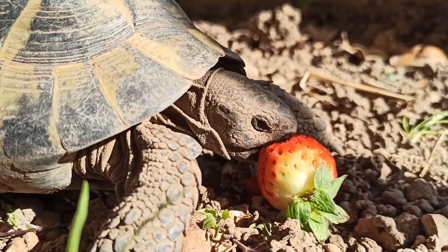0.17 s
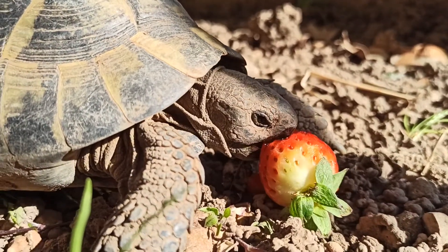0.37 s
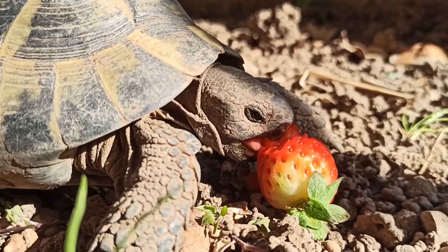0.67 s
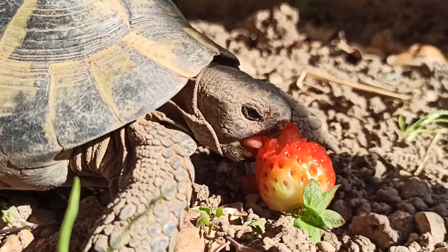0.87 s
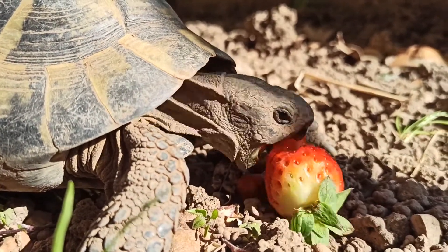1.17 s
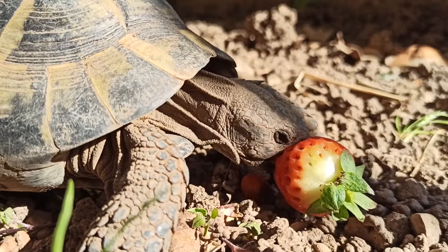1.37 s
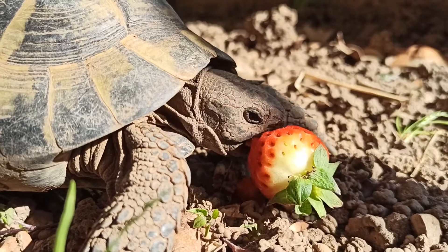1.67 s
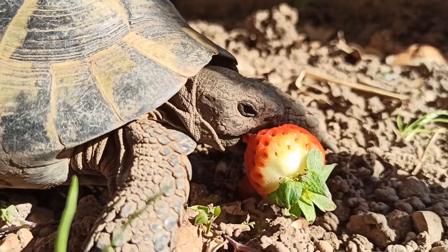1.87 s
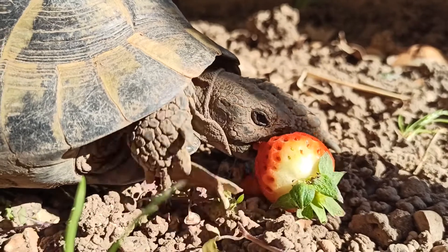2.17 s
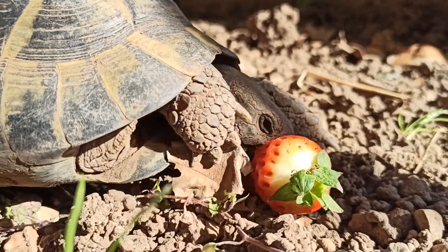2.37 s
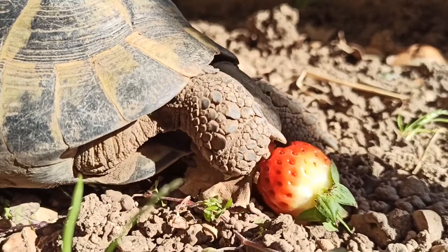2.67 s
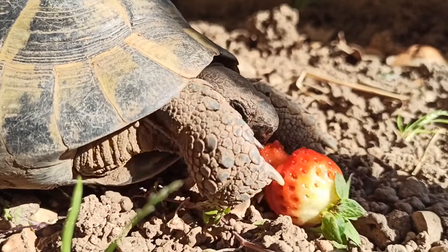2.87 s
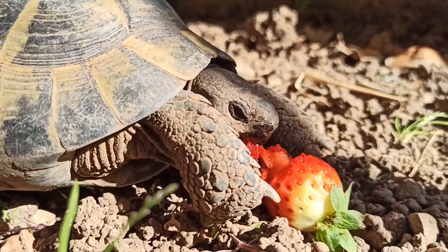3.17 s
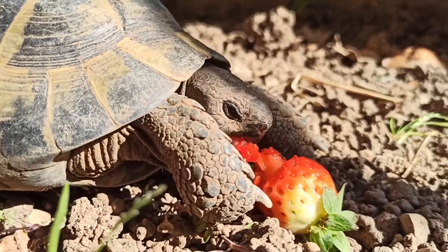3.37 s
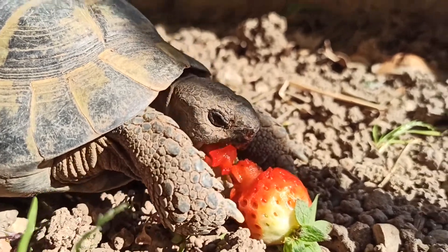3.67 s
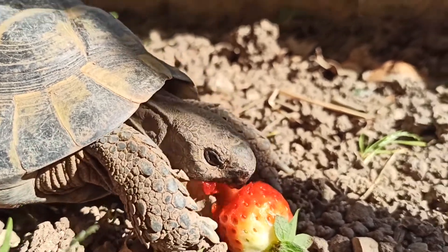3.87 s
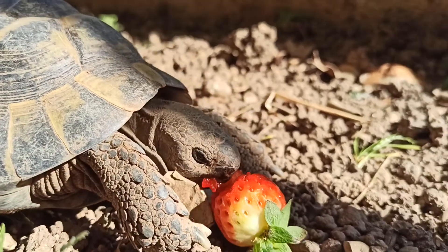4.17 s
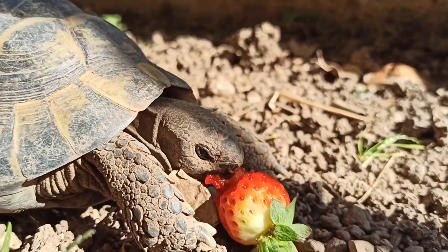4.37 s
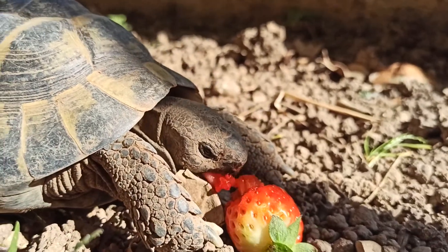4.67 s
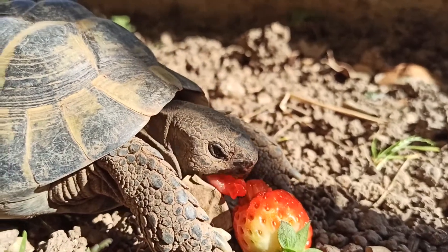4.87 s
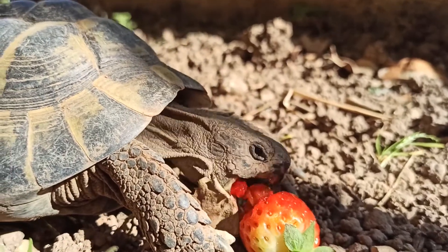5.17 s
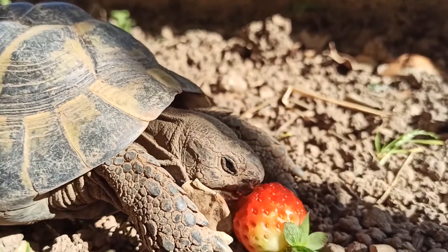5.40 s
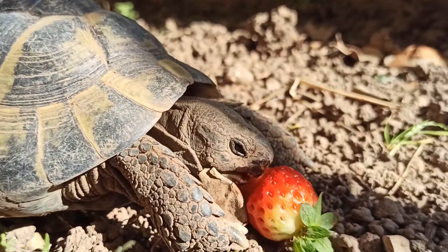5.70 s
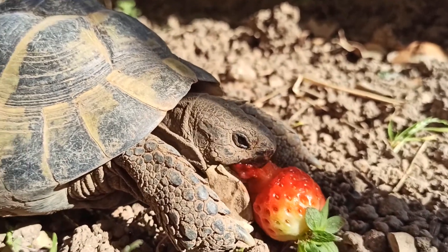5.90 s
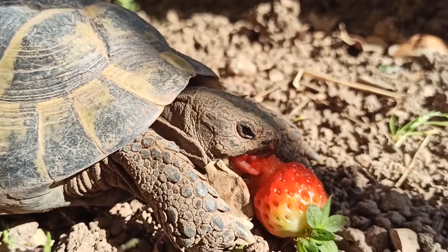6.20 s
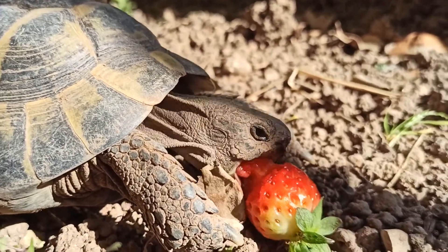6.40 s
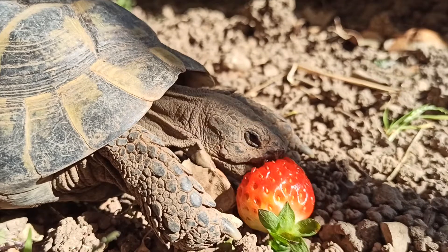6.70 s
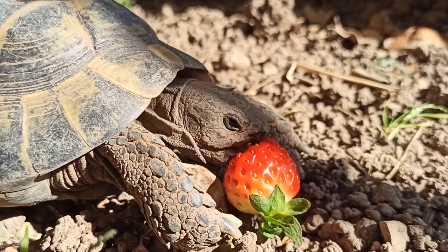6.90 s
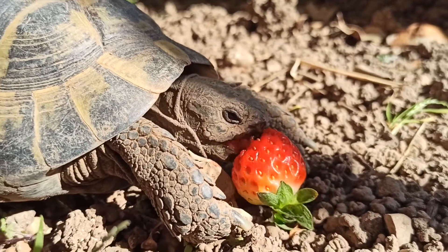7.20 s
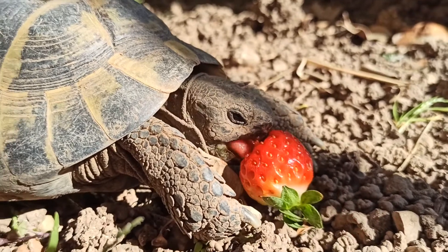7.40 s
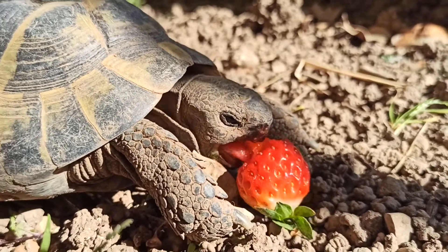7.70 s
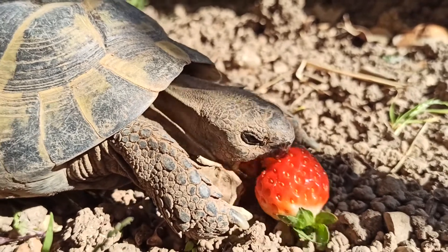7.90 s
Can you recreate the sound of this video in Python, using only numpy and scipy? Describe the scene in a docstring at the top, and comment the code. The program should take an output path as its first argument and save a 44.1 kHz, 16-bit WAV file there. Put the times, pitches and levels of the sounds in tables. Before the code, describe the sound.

A tortoise eats a strawberry on dry soil, heard very close outdoors with little bass and no echo. A soft low rumble and thin hiss run throughout; a faint wavering hum swells and fades within the first second. Tiny wet clicks come near 0.1 and 0.3 s, faint squishes at 0.6 and 1.2 to 1.5 s with a small pop. From 1.8 s the foreleg scrapes lightly, then crunches sharply around 2.2 to 2.9 s, with a brief dry rasp and snapping crumbs. Sparser scratches follow, with a strong crackling burst near 3.7 to 4.1 s. Soft low gulps start at 4.4 s. From about 5.1 to 5.9 s the shell slides with a coarse, gritty, ringing crunch. Moist pulp tears at 6.4 to 6.8 s, with another short scrape, then rapid sticky smacks and high juice pops at 7.0 to 7.6 s, and final soft squishes to 8 s.

```python
"""A tortoise eats a strawberry on dry, crumbly soil outdoors, close to a small microphone.
Filtered noise gives a steady rumble and hiss; a hum of two wavering sines swells in the first second.
Wet clicks (short noise breaks), squishes of pulp (dense grains) and single crumb cracks come next, then
popping juice (short sines) and scraping foreleg strokes (gated grit). Past 4.4 s soft gulps (falling
sines) join; near 5 to 6 s the shell slides over ringing clods; the last two seconds are mostly bites."""
import sys
import numpy as np
from scipy.fft import rfft, irfft, next_fast_len
from scipy.io import wavfile
from scipy.ndimage import map_coordinates

SR = 44100
rng = np.random.default_rng(int(sys.argv[2]) if len(sys.argv) > 2 else 0)


def int16_out(signal):
    """Quantize to a 16-bit WAV file."""
    q = np.round(np.clip(np.atleast_2d(signal).T, -1, 1) * 32767)
    wavfile.write(sys.argv[1], SR, q.astype(np.int16))


N = 355005

# Levels are those at the source, ahead of the microphone's response.
# Outdoor rumble and faint hiss. Each row: time in seconds, level in dB.
RUMBLE_LEVEL_S_DB = [(0, -50.5), (1.25, -52), (1.6, -54), (2.5, -55.5), (4.7, -56.5), (5.6, -55.5),
                     (6.3, -57), (8.05, -56.5)]
HISS_LEVEL_S_DB = [(0, -61), (1.2, -64), (4.4, -65.5), (6.2, -63), (7.3, -66.5), (8.05, -59.5)]
# Far-off hum. Each row: time in seconds, level in dB.
HUM_LEVEL_S_DB = [(0, -67), (.3, -54), (.8, -55.5), (1.05, -73.5), (8.05, -80)]
# Wet clicks of jaw, tongue and pulp. Each row: time in seconds, level over 5 ms in dB before SMACK_GAIN_DB,
# decay by 60 dB in seconds, body against the snap in dB.
SMACKS = [(0.0694, -48, 0.005, -20), (0.0785, -46.5, 0.0025, -25), (0.3449, -58, 0.027, -13),
          (1.3866, -53.5, 0.0087, -17), (1.4512, -45.5, 0.0028, -20), (4.4447, -56.8, 0.018, -3.5),
          (6.6662, -53, .007, -25), (6.9302, -51.5, .0033, -11), (7.0032, -49.5, 0.013, -16),
          (7.0453, -53, .009, -3), (7.0572, -58, .007, 6), (7.0998, -51.5, 0.033, 5.5),
          (7.1667, -62, 0.039, 12), (7.2872, -56, .011, -2), (7.2997, -47, 0.019, 4),
          (7.3282, -53.5, .014, 2), (7.4265, -49, .02, 3.5), (7.5263, -47, 0.025, 0.5),
          (7.5564, -52.5, 0.0049, 0), (7.571, -51, 0.0049, 1), (7.5789, -49.5, .005, 3),
          (7.603, -48.5, 0.025, -0.5), (7.9676, -48.5, 0.0058, -14)]
# Beak squeezing and tearing pulp. Each row: start in seconds, length in seconds,
# pulp level in dB before PULP_GAIN_DB, fizzing juice level in dB.
BITES = [(0.601, 0.057, -68, -59), (1.19, .11, -70.5, -72), (1.303, 0.15, -65.5, -57.5),
         (6.407, 0.085, -62, -73), (6.524, 0.32, -61, -75), (7.01, 0.035, -57, -68),
         (7.773, 0.25, -62.5, -80), (8.006, 0.042, -58, -76)]
# Hollow of the open beak. Each row: resonance in Hz, width in Hz, level against the pulp in dB.
BEAK_MODES = [(2330, 310, -1)]
# Larger crumbs of soil cracking. Each row: time in seconds, level over 5 ms in dB before CRACK_GAIN_DB,
# decay by 60 dB in seconds, body against the crack in dB.
CRUMBS = [(0.9475, -53, .029, -20), (2.0087, -49.5, 0.028, -29), (2.1022, -44, 0.025, -13.5),
          (2.3809, -41, 0.034, -13), (2.4015, -35.5, 0.02, -14), (2.4246, -34.5, 0.021, -24),
          (2.4795, -30.5, .012, -13.5), (2.4894, -39, 0.014, -18), (2.5628, -38.5, 0.017, -11.5),
          (2.6795, -45.5, .005, -11), (2.7522, -43, .012, -24), (2.8327, -38, 0.0059, -17.5),
          (2.8619, -45, .025, -19), (2.9079, -43.5, 0.033, -14), (3.1522, -49.5, 0.018, -2),
          (3.1574, -44, 0.0011, -3), (3.3027, -49.5, 0.02, -13), (3.5673, -39.5, 0.014, -12),
          (3.7395, -47.5, 0.0035, -13), (3.771, -45.5, 0.016, 1), (3.8017, -37, 0.0069, -15),
          (3.8305, -45.5, 0.0022, -10), (3.9863, -29.5, 0.0063, -18.5), (4.0174, -28.5, 0.013, -10),
          (4.0291, -29.5, 0.012, -9), (4.1171, -52, 0.0089, 11), (4.5798, -50, 0.019, -12),
          (4.7356, -47, 0.032, -10), (4.8806, -46.5, 0.004, -4), (4.9026, -37, 0.01, -13.5),
          (4.953, -47, .011, -15), (5.1185, -44.5, 0.0074, -7), (5.2688, -32.5, 0.021, -6),
          (5.3398, -40, 0.018, -16), (5.3623, -36.5, 0.017, -22), (5.4112, -39.5, 0.019, -4),
          (5.5008, -36.5, 0.02, -16), (5.5317, -38, 0.037, -9), (5.5673, -38.5, 0.04, -4),
          (5.637, -37, 0.023, -26), (5.6888, -40, 0.028, -17), (5.7054, -31.5, 0.014, -12),
          (5.7374, -30, .024, -13.5), (5.8068, -29.5, 0.019, -10), (6.0424, -51, 0.011, -7),
          (6.116, -46, 0.02, -5), (6.5526, -34.5, .031, -9.5), (6.5578, -41, 0.018, 0),
          (6.7398, -41.5, 0.022, -8), (6.7741, -37.5, .003, -9), (6.7805, -37.5, 0.025, -3),
          (6.8434, -47, 0.0036, -5), (7.0281, -45.5, .016, -17), (7.7869, -40.5, 0.01, -25)]
# Popping juice films and air pockets. Each row: time in seconds, peak in dB, starting pitch in Hz,
# decay by 60 dB in seconds.
POPS = [(1.451, -36, 2230, 0.019), (6.5589, -33, 2150, 0.026), (6.666, -40, 2430, 0.02),
        (7.028, -35.5, 3300, 0.015), (7.046, -36, 3300, .012), (7.1008, -51, 1470, .025),
        (7.3, -34.5, 4080, 0.015), (7.328, -31, 3780, 0.013), (7.4274, -32, 4070, 0.013),
        (7.428, -47.5, 1560, 0.047)]
# Strokes of a foreleg or the rolling fruit over the soil. Each row: start in seconds, length in seconds,
# grit level in dB before CLAW_GAIN_DB, level in dB of clods ground under the weight.
DRAGS = [(1.825, .21, -62, -81.5), (2.09, .28, -57.5, -73), (2.372, .118, -42.5, -56.5),
         (2.541, .23, -49.5, -58), (2.809, .11, -50, -68), (2.971, .04, -54, -68), (3.19, .16, -62.5, -72),
         (3.368, .07, -54.5, -73), (3.698, .1, -54.5, -63.5), (3.817, .145, -51.5, -59),
         (3.96, .1, -46, -56), (4.085, .07, -50, -55), (4.834, .065, -55, -59.5), (6.02, .13, -63, -77),
         (6.736, .108, -49, -55.5), (7.137, .26, -66, -75)]
# Scaly foreleg rubbing past the shell as it lifts. Each row: start in seconds, length in seconds, level in dB.
RASPS = [(2.203, 0.052, -43.5)]
# Soft, low knocks of the chewing mouth. Each row: time in seconds, level in dB before GULP_GAIN_DB.
GULPS = [(4.447, -43.5), (4.480, -41.5), (4.652, -41), (4.870, -34), (4.938, -41.5), (4.974, -45),
         (5.178, -42.5), (5.189, -41), (6.955, -46.5), (7.1, -43), (7.302, -41), (7.316, -39.5),
         (7.43, -47.5), (7.968, -44)]
# Shell sliding forward over grit. Each row: time in seconds, level in dB before its layers are mixed.
SLIDE_LEVEL_S_DB = [(4.9, -70), (5.12, -51.5), (5.32, -49), (5.4, -40.5), (5.63, -43), (5.72, -40.5),
                    (5.85, -44.5), (5.92, -65.5), (5.98, -75)]
# Small stones and clods under the shell. Each row: resonance in Hz, width in Hz, relative level in dB.
CLOD_MODES = [(715, 81, 2), (1200, 110, -9), (1870, 84, -3), (2650, 150, -12), (3370, 110, -0.5),
              (3870, 98, 4.5), (4655, 66, 2), (5800, 120, -5), (6540, 98, -15), (6660, 180, 4),
              (7670, 130, -5), (8100, 120, -8)]

# Spectra. Each row: frequency in Hz, relative level in dB per Hz.
RUMBLE_HZ_DB = [(28, -45), (40, -32), (52, 2), (64, -3.5), (100, 2.5), (170, 3), (260, -3), (400, -6.5),
                (600, -9.5), (1000, -20), (2000, -28), (5000, -67)]
HISS_HZ_DB = [(200, -13), (900, 1), (2300, 4.5), (4000, 8), (6500, 2.5), (8200, -6), (12000, -4.5),
              (16000, -7.5)]
TICK_HZ_DB = [(1500, -14), (4000, -3), (7000, 0), (15000, -1)]
SNAP_HZ_DB = [(1200, -41), (2400, -6.5), (3300, 11.5), (4300, 10), (6500, 5.5), (8500, -13), (15000, -21)]
MOUTH_HZ_DB = [(200, -1.5), (800, -7.5), (1500, -2), (2300, -7.5), (3200, -7), (6000, -44)]
PULP_HZ_DB = [(500, -6.5), (1300, -7.5), (2200, -5.5), (3100, 0), (4200, 2), (6700, 0.5), (8500, -12),
              (12000, -17), (15500, -18.5)]
FIZZ_HZ_DB = [(3000, -25), (7000, -7), (13000, 0)]
CRACK_HZ_DB = [(1500, -20), (3000, -10.5), (4200, 6.5), (5500, 4.5), (6700, 7.5), (8200, -6), (12000, -18),
               (16000, -12.5)]
CRUMB_BODY_HZ_DB = [(100, -13), (350, -4.5), (750, -1.5), (1400, 0.5), (2300, 4), (3400, 5.5),
                    (6000, -24.5)]
SOIL_HZ_DB = [(60, -45.5), (200, 5), (700, -12), (1200, -12.5), (2800, -10), (3700, -1), (4500, 4.5),
              (5400, 4), (6600, 1), (7600, -6), (8600, -39), (12000, -20), (15500, -25.5)]
GROUND_HZ_DB = [(300, -19.5), (750, 4), (1300, -3), (2600, 2), (5000, -14.5)]
DUST_HZ_DB = [(3000, -25), (7000, 8), (13000, -1)]
RASP_HZ_DB = [(1800, -30), (3100, -1.5), (4400, 8), (8000, -14.5)]
SHELL_HZ_DB = [(60, -25), (200, -8.5), (700, -6.5), (1100, -12), (2800, -5), (3400, -4), (4600, 1),
               (5500, 0), (6500, 2), (7100, -10), (7550, -3.5), (8600, -9.5), (12000, -17), (15000, -18)]
# Microphone's bass cut and uneven treble. Each row: frequency in Hz, gain in dB.
MIC_HZ_DB = [(30, -17), (46, -4.5), (4650, -4.5), (4850, -12), (5850, -12), (6200, -6), (6700, -3),
             (7100, -3), (7550, 1.5), (7850, -3), (8400, -4.5), (8750, -18.5), (10300, -23.5),
             (11350, -24.5), (11650, -6.5), (15500, -2.5)]

MIC_TOP_HZ = 15950
SMACK_GAIN_DB, PULP_GAIN_DB, CRACK_GAIN_DB, CLAW_GAIN_DB, GULP_GAIN_DB = 5.5, 9.0, 3.5, 2.5, 4.0
BITE_ATTACK_S, BITE_RELEASE_S = 0.013, 0.017
DRAG_ATTACK_S, DRAG_RELEASE_S = 0.018, 0.015
RASP_ATTACK_S, RASP_RELEASE_S = 0.0056, 0.0086
# level against the scrape (before CRACK_GAIN_DB), its scatter, median decay, body against the crack
SMALL_CRUMB_DB, SMALL_SCATTER_DB, SMALL_T60_S, SMALL_BODY_DB = -0.5, 3.5, 0.025, -9.5
# level at a -50 dB stroke, dB gained per dB of stroke, settling time
DUST_DB, DUST_GROWTH_DB_PER_DB, DUST_SETTLE_S = -65.5, 0.22, 0.06


def amp(db):
    """Decibels to gain."""
    return 10 ** (np.asarray(db) / 20)


def unit(x):
    """Scale to rms 1."""
    return x / np.sqrt(np.mean(x ** 2) + 1e-20)


def along(points, hz):
    """Read (Hz, dB) points on a log frequency axis."""
    f, db = np.transpose(points)
    return np.interp(np.log(hz + 1), np.log(f + 1), db)


def level(rows, outside_db=None):
    """Gain per sample from (s, dB) rows; outside them the end values hold unless outside_db is given."""
    s, db = np.transpose(rows)
    return amp(np.interp(np.arange(N) / SR, s, db, left=outside_db, right=outside_db))


def wobble(knots_hz):
    """Smooth random curve through knots_hz normal draws a second."""
    knots = rng.standard_normal(int(N * knots_hz / SR) + 4)
    return map_coordinates(knots, [np.arange(N) * knots_hz / SR])


def strokes(rows, attack_s, release_s):
    """Gain per sample from (start, length, dB) rows: each stroke rises, holds and dies away."""
    t, gain = np.arange(N) / SR, np.zeros(N)
    for start_s, length_s, db in rows:
        rise = np.clip((t - start_s) / attack_s, 0, 1)
        fall = np.exp(-np.maximum(t - start_s - length_s, 0) / release_s)
        gain = np.maximum(gain, amp(db) * rise * fall)
    return gain


def coloured(x, points, ripple_db=0, order=70):
    """Causal minimum-phase filter with the given spectrum and, if wanted, chance resonances."""
    m = 2 * next_fast_len(len(x) // 2 + 1024)
    cepstrum = irfft(np.log(amp(along(points, np.fft.rfftfreq(m, 1 / SR)))), m)
    # fold to positive time: minimum phase
    cepstrum[1:m // 2] *= 2
    cepstrum[m // 2 + 1:] = 0
    ripple = np.log(amp(ripple_db)) * np.sqrt(2 / order)
    cepstrum[1:order + 1] += ripple * rng.standard_normal(order)
    return irfft(rfft(x, m) * np.exp(rfft(cepstrum)), m)[:len(x)]


def resonate(x, modes):
    """Pass x through a parallel bank of (Hz, width Hz, dB) resonances."""
    m = next_fast_len(N + SR // 4)
    f = np.fft.rfftfreq(m, 1 / SR)
    response = np.zeros(len(f), complex)
    for hz, width_hz, db in modes:
        damping = 1j * f * width_hz
        response += amp(db) * damping / (hz * hz - f * f + damping)
    return irfft(rfft(x, m) * response, m)[:N]


def grains(spectrum, rate_hz, spread_db, ripple_db, spots):
    """Random tiny fractures of rms 1; the contact wanders between spots that ring differently."""
    out = np.zeros(N)
    for _ in range(spots):
        hit = rng.random(N) < rate_hz / spots / SR
        size = amp(spread_db * np.clip(rng.standard_normal(N), -2, 2))
        fractures = hit * size * rng.choice([-1, 1], N)
        out += unit(coloured(fractures, spectrum, ripple_db)) * amp(3.5 * wobble(45))
    return unit(out)


def clicks(rows, bright, body, ripple_db):
    """A short click is one sharp break; a long one crumbles in a swelling run of small breaks."""
    out, t = np.zeros(N + SR), np.arange(SR // 16) / SR
    for s, db, t60_s, body_db in rows:
        t60_s = max(t60_s, 0.001)
        crumble = np.clip((t60_s - 0.009) / 0.014, 0, 1)  # 0: one break, 1: a run
        swell = 1 - np.exp(-t / (0.0001 + 0.05 * t60_s * crumble))
        tail = amp(-27 - 60 * t / 0.05)
        run = swell * amp(-60 * t / t60_s) + tail
        breaks = 0.25 * run * rng.standard_normal(len(t)) * (rng.random(len(t)) < 0.35)
        breaks[0] = rng.choice([-1, 1]) * (1 - crumble)
        high = unit(coloured(breaks, bright, ripple_db, order=30))
        low = unit(coloured(breaks, body, ripple_db, order=30))
        click = high + amp(body_db) * low
        out[round(s * SR):][:len(t)] += amp(db) * click / np.std(click[t < 0.005])
    return out[:N]


def outdoors():
    """Distant, slowly uneven rumble under a thin, even hiss: two filtered noises."""
    rumble = unit(coloured(rng.standard_normal(N), RUMBLE_HZ_DB)) * amp(0.85 * wobble(11))
    hiss = unit(coloured(rng.standard_normal(N), HISS_HZ_DB))
    return level(RUMBLE_LEVEL_S_DB) * rumble + level(HISS_LEVEL_S_DB) * hiss


def wavering_tone(hz, waver_hz):
    """Sine whose pitch and level drift at random."""
    phase = 2 * np.pi * np.cumsum(hz + waver_hz * wobble(12)) / SR
    return np.sin(phase) * amp(2.5 * wobble(10))


def hum():
    """Distant, wavering hum that swells early, with a weak upper tone throughout."""
    low = level(HUM_LEVEL_S_DB, outside_db=-120) * wavering_tone(238, waver_hz=3.52)
    return low + amp(-69.0) * wavering_tone(530, waver_hz=11.78)


def ticks():
    """Loose grains shift at random under the animal and the fruit."""
    return amp(-72.0) * grains(TICK_HZ_DB, rate_hz=60, spread_db=6, ripple_db=2, spots=2)


def smacks():
    """Juice films snap in the mouth."""
    return amp(SMACK_GAIN_DB) * clicks(SMACKS, SNAP_HZ_DB, MOUTH_HZ_DB, ripple_db=1.8)


def bites():
    """Pulp tears in the hollow beak and juice fizzes as its cells burst."""
    squeeze = strokes([(s, length, db) for s, length, db, _ in BITES], BITE_ATTACK_S, BITE_RELEASE_S)
    juice = strokes([(s, length, db) for s, length, _, db in BITES], BITE_ATTACK_S, BITE_RELEASE_S)
    pulp = squeeze * grains(PULP_HZ_DB, rate_hz=1500, spread_db=7.0, ripple_db=7.0, spots=6)
    fizz = juice * grains(FIZZ_HZ_DB, rate_hz=800, spread_db=3, ripple_db=1, spots=1)
    return amp(PULP_GAIN_DB) * (pulp + resonate(pulp, BEAK_MODES)) + fizz


def drag_level():
    """Gain of the foreleg and fruit strokes."""
    return strokes([(s, length, db) for s, length, db, _ in DRAGS], DRAG_ATTACK_S, DRAG_RELEASE_S)


def slide_level():
    """Gain of the shell's slide."""
    return level(SLIDE_LEVEL_S_DB, outside_db=-120)


def small_crumbs(scrape, count=36):
    """Click rows for crumbs that break by chance: the harder the scrape, the more and the louder."""
    chance = np.cumsum(np.sqrt(scrape))
    share = (np.arange(count) + rng.random(count)) / count
    rows = []
    for i in np.searchsorted(chance, chance[-1] * share):
        size, life = rng.standard_normal(2)
        db = 20 * np.log10(scrape[i]) + SMALL_CRUMB_DB + SMALL_SCATTER_DB * size
        rows.append((i / SR, db, SMALL_T60_S * np.exp(0.5 * life), SMALL_BODY_DB))
    return rows


def cracks():
    """Larger crumbs crack singly; smaller ones give way at random under scraping."""
    rows = list(CRUMBS) + small_crumbs(drag_level() + slide_level())
    return amp(CRACK_GAIN_DB) * clicks(rows, CRACK_HZ_DB, CRUMB_BODY_HZ_DB, ripple_db=2.5)


def pops(rise=0.031):
    """A tiny air pocket rings for a moment, its pitch rising by the given fraction as it opens."""
    out, t = np.zeros(N + SR), np.arange(SR // 20) / SR
    for s, db, hz, t60_s in POPS:
        pitch_hz = hz * (1 + rise * np.minimum(t / t60_s, 1))
        phase = 2 * np.pi * np.cumsum(pitch_hz) / SR
        out[round(s * SR):][:len(t)] += amp(db - 60 * t / t60_s) * np.sin(phase)
    return out[:N]


def slips(knots_hz):
    """Uneven gain of a slipping contact."""
    return amp(2.8 * wobble(knots_hz))


def drags():
    """Strokes grind fine grit in uneven slips and press on clods."""
    weight = strokes([(s, length, db) for s, length, _, db in DRAGS], DRAG_ATTACK_S, DRAG_RELEASE_S)
    grit = grains(SOIL_HZ_DB, rate_hz=2000, spread_db=4.5, ripple_db=4.5, spots=6)
    claws = drag_level() * unit(grit * slips(140))
    ground = weight * grains(GROUND_HZ_DB, rate_hz=800, spread_db=5, ripple_db=3, spots=2)
    return amp(CLAW_GAIN_DB) * claws + ground


def dust():
    """Fine dust stirred by every stroke settles slowly."""
    rows = [(s, length, DUST_GROWTH_DB_PER_DB * (db + 50)) for s, length, db, _ in DRAGS]
    stirred = strokes(rows, DRAG_ATTACK_S, DUST_SETTLE_S)
    return amp(DUST_DB) * stirred * grains(DUST_HZ_DB, rate_hz=1000, spread_db=3, ripple_db=3, spots=1)


def rasp():
    """Scales rub the shell in a brief burst of equal-sized grains."""
    rub = strokes(RASPS, RASP_ATTACK_S, RASP_RELEASE_S)
    return rub * grains(RASP_HZ_DB, rate_hz=2400, spread_db=0, ripple_db=1.5, spots=1)


def gulps(start_hz=420, end_hz=100, glide_s=0.0036, t60_s=0.069, attack_s=0.00041):
    """A soft knock whose pitch falls as the mouth cavity opens."""
    out, t = np.zeros(N + SR), np.arange(SR // 10) / SR
    envelope = np.exp(-np.log(1000) * t / t60_s) * (1 - np.exp(-t / attack_s))
    for s, db in GULPS:
        scatter = np.exp(0.12 * rng.standard_normal())
        hz = (end_hz + (start_hz - end_hz) * np.exp(-t / glide_s)) * scatter
        tone = np.sin(2 * np.pi * np.cumsum(hz) / SR)
        noise = unit(coloured(rng.standard_normal(len(t)), RUMBLE_HZ_DB))
        out[round(s * SR):][:len(t)] += amp(db + GULP_GAIN_DB) * (tone + 0.33 * noise) * envelope
    return out[:N]


def shell():
    """The shell slides over grit; its weight makes the clods ring and the ground thud."""
    grit = grains(SHELL_HZ_DB, rate_hz=2400, spread_db=6.5, ripple_db=3.0, spots=5)
    grit = unit(grit * slips(110))
    ring = unit(resonate(grit, CLOD_MODES))
    thud = grains(RUMBLE_HZ_DB, rate_hz=200, spread_db=4.5, ripple_db=0.5, spots=2)
    return slide_level() * (amp(0.5) * grit + amp(-3.0) * ring + amp(-10.5) * thud)


def scene():
    """Sum of all sources, close and dry, in the open air."""
    background = outdoors() + hum() + ticks()
    eating = smacks() + bites() + pops() + gulps()
    soil = cracks() + drags() + dust() + rasp() + shell()
    return (background + eating + soil)[None]


def record(dry):
    """The microphone cuts the bass, colours the treble and keeps nothing above its band limit."""
    m = next_fast_len(N + SR // 2)
    hz = np.fft.rfftfreq(m, 1 / SR)
    response = amp(along(MIC_HZ_DB, hz)) * (hz < MIC_TOP_HZ)
    return irfft(rfft(dry, m) * response, m)[:, :N]


dry = scene()
out = record(dry)
int16_out(out)
```